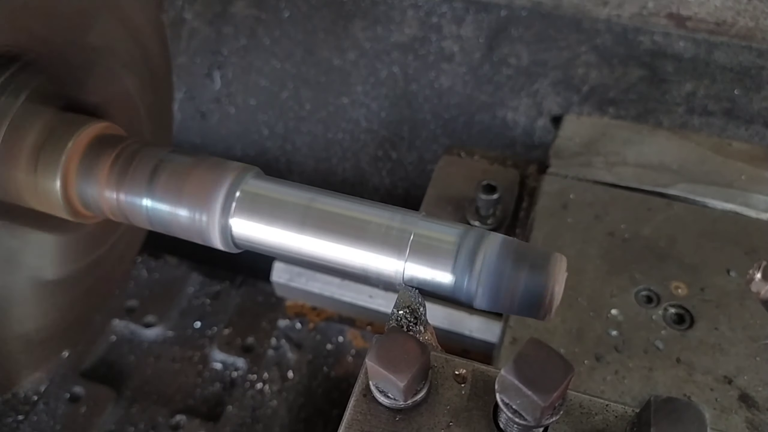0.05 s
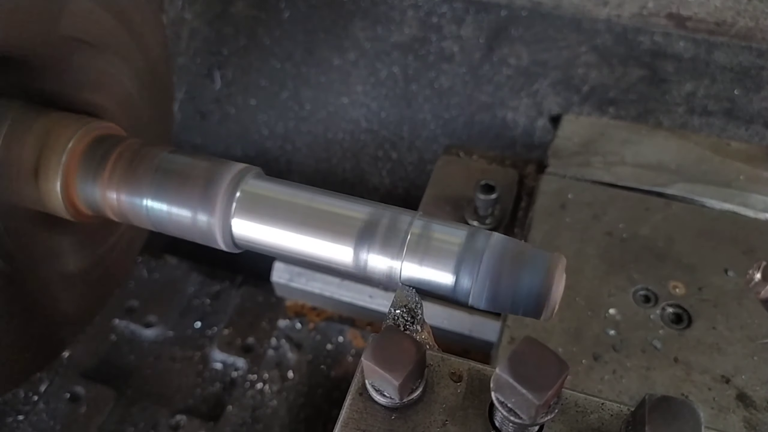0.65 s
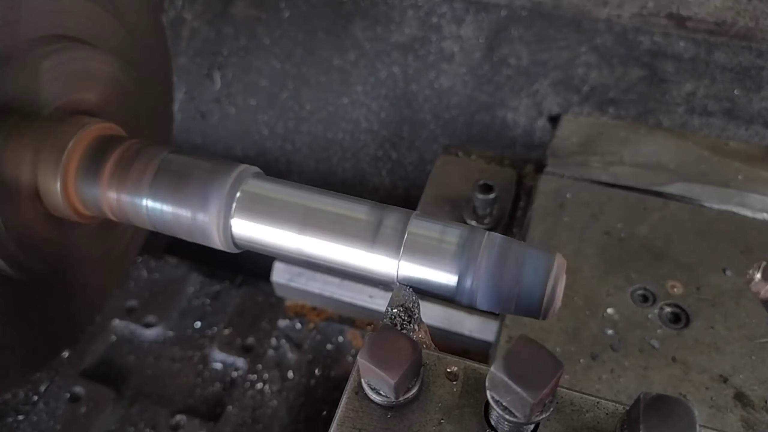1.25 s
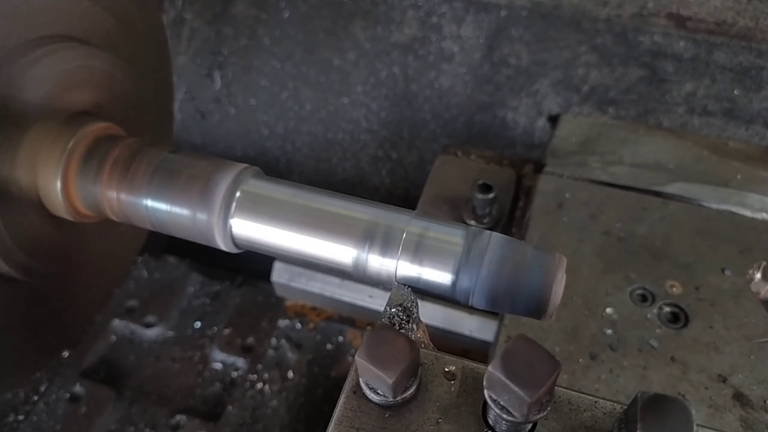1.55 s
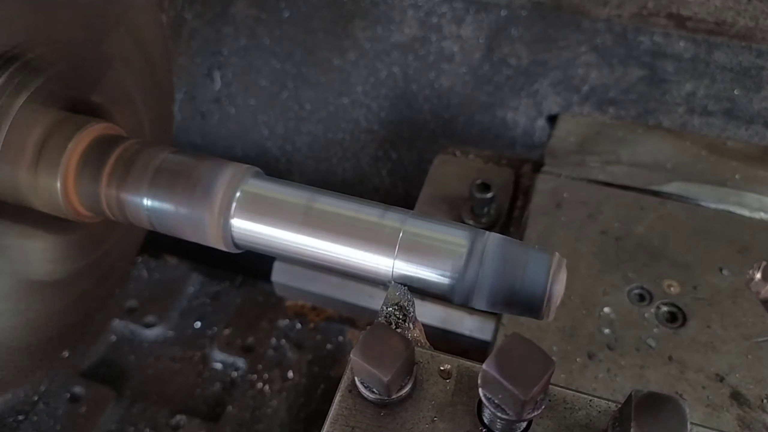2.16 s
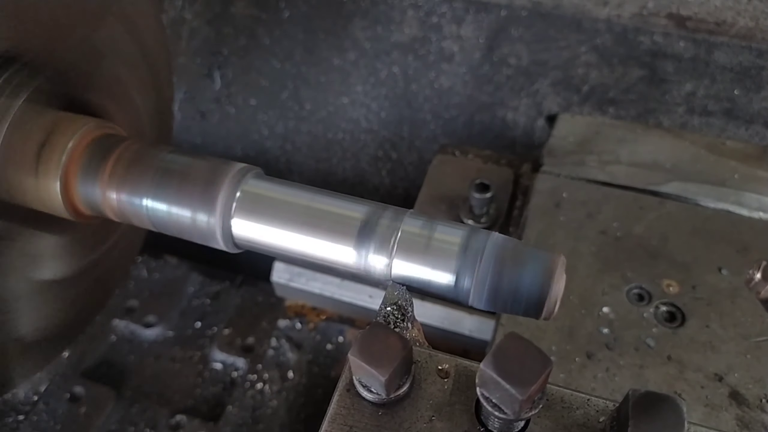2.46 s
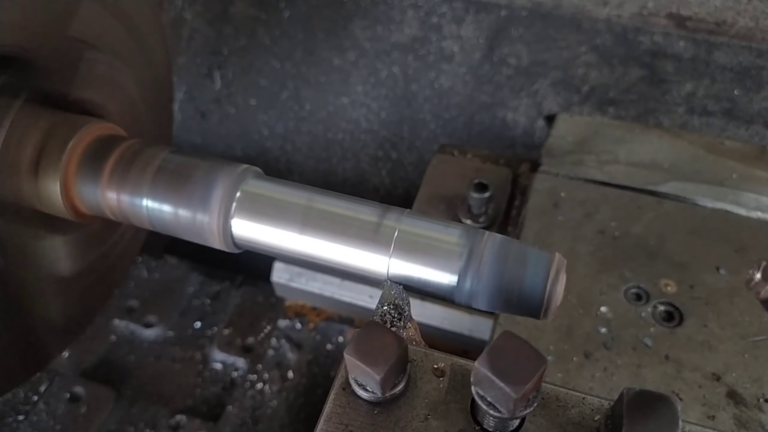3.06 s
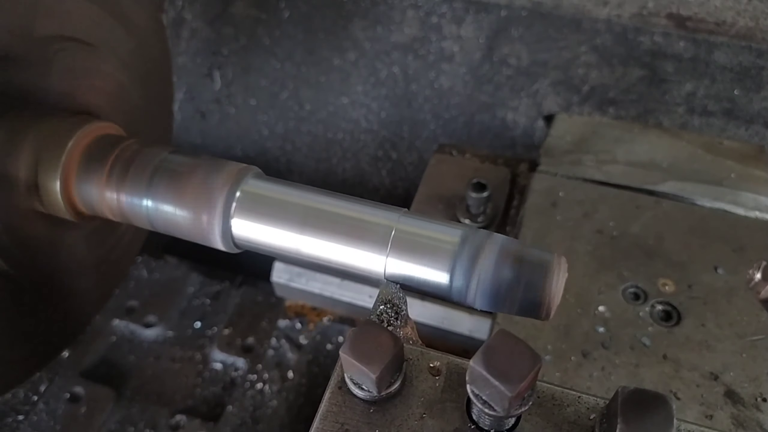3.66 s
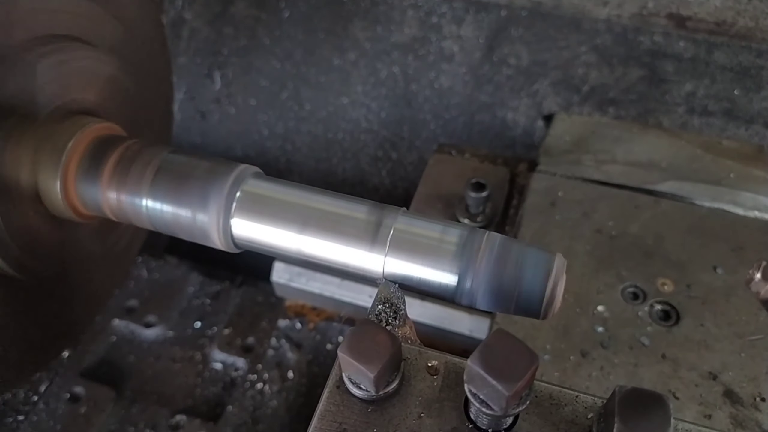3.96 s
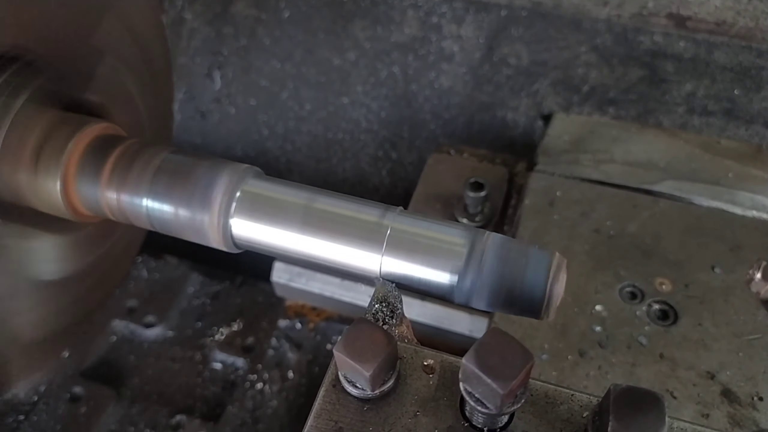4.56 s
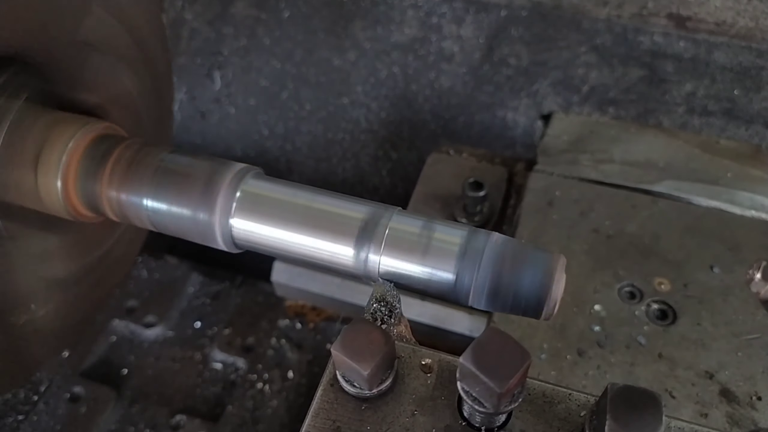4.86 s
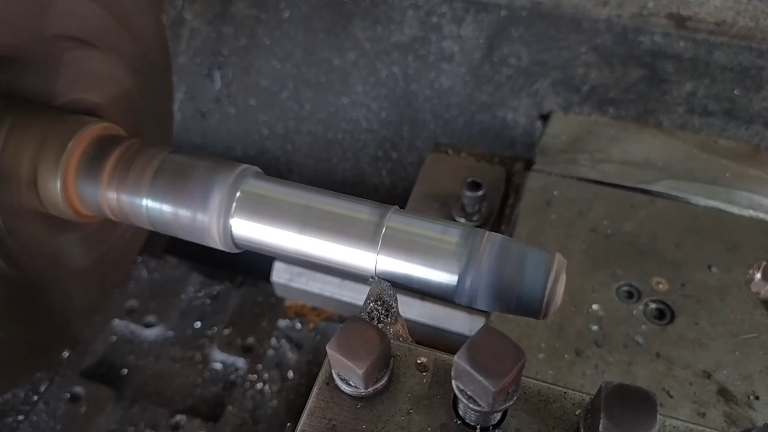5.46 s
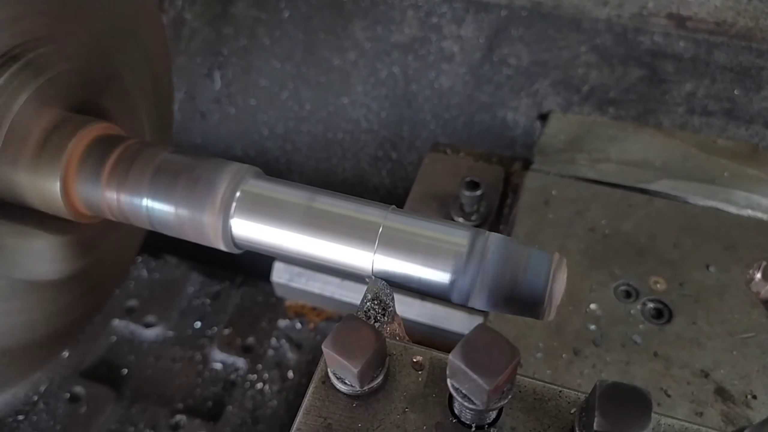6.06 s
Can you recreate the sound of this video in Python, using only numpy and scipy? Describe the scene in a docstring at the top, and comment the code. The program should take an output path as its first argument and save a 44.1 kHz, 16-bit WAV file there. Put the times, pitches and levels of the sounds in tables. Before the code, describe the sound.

A metal lathe runs steadily, its gears whining and rattling while the tool hisses along a spinning steel shaft.

```python
"""Whining, rattling gears and a bright hiss: a manual lathe takes a light cut along a steel shaft.
The headstock gears sing as they mesh and tick with each turn of their shafts; a bearing sizzles.
The chip hisses off the tool and rings the tool post, the edge squeals faintly, and for a while the
cut runs harder. Near the end something knocks once on the machine. One microphone above the tool,
on the right channel, with the workshop's low rumble behind; the left channel is all but dead."""
import sys
import numpy as np
from scipy import signal
from scipy.fft import rfft, irfft, next_fast_len
from scipy.io import wavfile
from scipy.ndimage import uniform_filter1d

SR = 44100
rng = np.random.default_rng(int(sys.argv[2]) if len(sys.argv) > 2 else 0)


def inscribe(sig):
    """Save sig as 16-bit PCM at rate SR to the path in sys.argv[1].

    A 1-D sig is mono; a 2-D sig holds one channel per row.
    Samples are clipped to [-1, 1] before scaling.
    """
    pcm = np.round(np.clip(np.atleast_2d(sig).T, -1, 1) * 32767)
    wavfile.write(sys.argv[1], SR, pcm.astype(np.int16))


N = 278712
TIME = np.arange(N) / SR
SIZE = next_fast_len(N)
BINS = np.maximum(np.arange(SIZE // 2 + 1) * SR / SIZE, 1)   # Hz

DRIVE_HZ, LAYSHAFT_HZ, PINION_HZ, SPINDLE_HZ = 29.83, 37.93, 39.245, 5.27   # turns per second
PINION_TEETH, DRIVE_TEETH = 58, 23
SPEED_WAVER = 0.000609   # share by which the motor's speed wanders


def from_db(db):
    """Decibels to gain."""
    return 10 ** (np.asarray(db) / 20)


def rms_one(x):
    """Scale to unit rms."""
    return x / np.sqrt(np.mean(x ** 2) + 1e-20)


def even(x):
    """Unit level over each twentieth of a second; the fast grain stays."""
    return x / np.sqrt(uniform_filter1d(x ** 2, size=SR // 20) + 1e-20)


def in_time(rows):
    """A curve of (time, level) points, at every sample."""
    return np.interp(TIME, *np.transpose(rows))


def swells(rows):
    """Decibels added by bell-shaped swells of (peak time, length, rise)."""
    return sum(db * np.exp(-(2 * (TIME - s) / length) ** 2) for s, length, db in rows)


def white():
    """White noise."""
    return rng.standard_normal(N)


def filtered(x, response):
    """Pass a sound through a frequency response."""
    return irfft(rfft(x, SIZE) * response, SIZE)[:N]


def drift(rate_hz):
    """A slow random wander of unit rms."""
    return rms_one(filtered(white(), 1 / (1 + (BINS / rate_hz) ** 2)))


def colour(points):
    """Gain at each frequency from a few (frequency, level) points."""
    hz, db = np.transpose(points)
    return from_db(np.interp(np.log(BINS), np.log(hz), db))


def resonances(modes):
    """Gain at each frequency of (frequency, width, level) modes that add in power."""
    return np.sqrt(sum(from_db(db) ** 2 / (1 + ((BINS ** 2 - hz ** 2) / (BINS * width)) ** 2)
                       for hz, width, db in modes))


def fine_modes(spread_db, width_hz):
    """A steel body has countless close modes: small peaks and dips in its response."""
    ripple = uniform_filter1d(rng.standard_normal(len(BINS)), size=max(1, int(width_hz * SIZE / SR)))
    return from_db(spread_db * rms_one(ripple))


def throb(turns, order, depth_db):
    """A gain that peaks `order` times per turn of a shaft."""
    return from_db(depth_db * np.cos(2 * np.pi * order * turns))


def tone(hz, waver_hz, flutter_db):
    """A sine of rms about 1 whose pitch and level waver."""
    phase = 2 * np.pi * (np.cumsum(hz + waver_hz * drift(9.07)) / SR + rng.random())
    return np.sqrt(2) * np.sin(phase) * from_db(flutter_db * drift(4.9))


def workshop():
    """Room tone: a low rumble, and the lathe bed droning in its low modes."""
    # spectrum of the room: (frequency [Hz], level [dB])
    rumble_colour = [(15, 2), (30, 2.5), (80, -2.5), (150, -0.5), (200, -0.5), (350, 2), (1000, -12),
                     (4000, -35)]
    # modes of the bed: (frequency [Hz], width [Hz], level [dB])
    bed_modes = [(113, 13, 0), (154, 10, -2.5)]
    rumble = from_db(-65) * rms_one(filtered(white(), colour(rumble_colour)))
    bed = resonances(bed_modes) ** 1.6   # a power above 1 sharpens the peaks
    return rumble + from_db(-76) * rms_one(filtered(white(), bed))


def knock(contact_s, tail_s, tail_db):
    """A short clattering contact rings the steel; the workshop answers with a diffuse tail."""
    # the knock and its rebound: (time [s], level [dB])
    hits = [(6.21, -27.5), (6.2154, -31)]
    # modes of the struck steel: (frequency [Hz], level [dB], time to fall 60 dB [s])
    modes = [(718, 2, .027), (1080, -4, 0.02), (1320, -3, 0.015), (1560, 2, 0.021), (1910, 1.5, 0.026),
             (2310, -9, .013), (2670, 4, 0.033), (3090, 7, 0.021), (3480, -7, .017), (4750, -5, .01)]
    steel = resonances([(hz, np.log(1000) / (np.pi * t60), db) for hz, db, t60 in modes])
    out = np.zeros(N)
    for s, db in hits:
        age = np.maximum(TIME - s, 0)
        envelope = (TIME >= s) * (np.exp(-age / contact_s) + from_db(tail_db) * np.exp(-age / tail_s))
        out += from_db(db) * envelope * even(filtered(white(), steel))
    low_cut = signal.butter(4, 650, "high", fs=SR, output="sos")   # the knock carries no bass below about 650 Hz
    return signal.sosfilt(low_cut, out + 1e-18)


def bearing(turns):
    """A shaft bearing sizzles in rapid ticks, four to a turn, one of them the strongest."""
    # modes of the bearing: (frequency [Hz], width [Hz], level [dB])
    modes = [(6880, 110, -1), (7184, 164, -3), (7540, 160, -9), (8480, 44, -8), (9450, 230, -8),
             (10780, 560, -7.5), (13900, 80, -15)]
    # surges of the sizzle: (peak time [s], length [s], rise [dB])
    surges = [(.5, .5, 0.5), (1.4, 0.33, 2), (3.7, .45, 2), (4.55, 0.28, 2.5), (5.85, .3, 1.5)]
    pulsing = throb(turns, order=1, depth_db=2.5) * throb(turns, order=4, depth_db=5.0)
    body = resonances(modes) ** 1.3 * fine_modes(spread_db=4.0, width_hz=14)
    level_db = -45.5 + swells(surges) + 0.78 * drift(14)
    return from_db(level_db) * rms_one(filtered(white() * pulsing, body))


def chatter(turns, uneven_db, burst_s):
    """Backlash rattles the gears in uneven bursts, which ring two modes of the headstock."""
    # the two modes: (frequency [Hz], width [Hz], resting level [dB])
    modes = [(883, 66, -47.5), (1219, 64, -49.5)]
    # loudest bursts: (peak time [s], rise of lower mode [dB], rise of upper mode [dB])
    bursts = [(.25, 0.5, 8.5), (1.77, 6, 0), (2.22, 4, 2), (3.39, 4.5, -5), (4.1, 4.5, 5), (5.53, 6, -4),
              (5.68, 0, 10)]
    ticking = throb(turns, order=1, depth_db=-0.5)
    out = np.zeros(N)
    for k, (hz, width, db) in enumerate(modes):
        burst_db = swells([(s, burst_s, rises[k]) for s, *rises in bursts])
        ring = even(filtered(white() * ticking, resonances([(hz, width, 0)]) ** 1.42))
        out += from_db(db + burst_db + uneven_db * drift(17)) * ring
    return out * throb(turns, order=7, depth_db=0.7)


def gear_rattle(turns, hard, repeat_share):
    """Teeth knock together, their flaws coming back every turn; the casing rings up in the hard cut."""
    # loudness of the rattle: (time [s], level [dB])
    rattle_level = [(0, -40.5), (1.2, -41), (2.0, -41.2), (2.8, -40.5), (4.5, -40.5), (5.3, -41.5),
                    (6.3, -40.5)]
    # its broad spectrum: (frequency [Hz], level [dB])
    gear_colour = [(200, -42), (350, -19), (420, -10), (520, -10), (620, -1), (800, -3.5), (1000, -2),
                   (1220, -4.5), (1400, -2.5), (1540, -5), (2150, -3.5), (2600, -8.5), (3500, -11),
                   (6000, -20.5), (15000, -49)]
    # modes of the headstock: (frequency [Hz], width [Hz], level [dB])
    headstock_modes = [(435, 17, -28), (708, 22, -7), (1340, 13, -6), (1692, 18, -1.5), (1880, 39, -3),
                       (1936, 65, -3.5), (2238, 170, -5.5)]
    # modes of the casing: (frequency [Hz], width [Hz], level [dB])
    casing_modes = [(1080, 130, -1.2), (1365, 48, 2.2)]
    flaws = rng.standard_normal(int(SR / DRIVE_HZ))
    flaws = irfft(np.exp(1j * np.angle(rfft(flaws))))   # all harmonics of the turn are driven alike
    repeating = rms_one(np.interp(turns % 1, np.linspace(0, 1, len(flaws)), flaws))
    force = np.sqrt(repeat_share) * repeating + np.sqrt(1 - repeat_share) * white()
    ticking = throb(turns, order=1, depth_db=0.96) * throb(turns, order=7, depth_db=0.6)
    body = np.hypot(colour(gear_colour), from_db(4) * resonances(headstock_modes))
    body /= np.sqrt(1 + (400 / BINS) ** 8)   # the casting radiates little bass
    rattle = from_db(in_time(rattle_level)) * rms_one(filtered(force * ticking, body))
    shaking = white() * throb(turns, order=1, depth_db=2.0)
    casing = even(filtered(shaking, resonances(casing_modes) ** 1.34))
    return rattle + from_db(-59 + 14 * hard) * casing


def gear_whine(speed, run_s):
    """Meshing teeth sing at pitches that follow the motor; the main mesh throbs with its shafts."""
    # swell and fade of the main mesh: (time [s], relative level [dB])
    main_level = [(0.0, -46), (0.8, -48), (0.96, -42.5), (1.2, -47.5), (1.28, -43), (1.76, -46.5),
                  (2.16, -47.1), (2.32, -43), (2.88, -46), (3.36, -47), (4.4, -44), (4.64, -47.3),
                  (4.88, -44.5), (5.52, -47.0), (6.08, -49), (6.31, -42)]
    # swell and fade of the lower mesh: (time [s], relative level [dB])
    low_level = [(0.0, -43.5), (0.72, -54), (0.88, -45), (1.2, -45), (1.44, -56), (1.6, -45.5), (2.16, -46),
                 (2.32, -48), (2.8, -45.8), (3.2, -55), (3.44, -44), (4.32, -52), (4.64, -47.9),
                 (5.2, -53.5), (5.44, -47.9), (6.0, -52), (6.16, -47.5), (6.31, -56)]
    # faint low tones of motor, gears and bearings: (frequency [Hz], relative level [dB])
    hum_tones = [(150.7, -77.5), (398.4, -63), (446.8, -69), (646.0, -62)]
    # tones added by uneven teeth: (frequency [Hz], relative level [dB])
    sideband_tones = [(893.6, -54), (1163, -55), (1222, -53.5), (1251, -53.5), (1319, -58.5), (1405, -54.5),
                      (1669, -63.5), (1852, -55)]
    # faint high tones of motor, gears and bearings: (frequency [Hz], relative level [dB])
    whine_tones = [(2807, -59.5), (3192, -66), (3709, -57.5), (3887, -58), (4447, -61), (4554, -50.5),
                   (4634, -60), (5006, -60), (5087, -59), (6988, -55), (7063, -56), (7880, -63),
                   (8339, -63)]

    def tones(rows, waver_hz, flutter_db):
        """A set of tones that follow the motor's speed."""
        return sum(from_db(db) * tone(hz * speed, waver_hz, flutter_db) for hz, db in rows)

    runout = throb(PINION_HZ * run_s, order=1, depth_db=2.3)
    runout *= throb(SPINDLE_HZ * run_s, order=1, depth_db=1.0)
    main_gain = from_db(in_time(main_level) - 0.1) * runout
    main = main_gain * tone(PINION_TEETH * PINION_HZ * speed, waver_hz=0.94, flutter_db=0.76)
    low_gain = from_db(in_time(low_level) - 1.55 + 2.0 * drift(18))
    low = low_gain * tone(DRIVE_TEETH * DRIVE_HZ * speed, waver_hz=1.6, flutter_db=1.55)
    hums = from_db(-2.5) * tones(hum_tones, waver_hz=2.24, flutter_db=2.0)
    sidebands = from_db(-3.5) * tones(sideband_tones, waver_hz=1.99, flutter_db=3.0)
    whines = from_db(-1.7) * tones(whine_tones, waver_hz=1.57, flutter_db=2.04)
    return main + low + hums + sidebands + whines


def hard_cut(start_s, attack_s, hold_s, release_s):
    """How far the cut has gone into its hard stretch, 0 to 1."""
    corners = start_s + np.cumsum([0, attack_s, hold_s, release_s])
    return np.interp(TIME, corners, [0, 1, 1, 0])


def tool_post(hard):
    """The cut rings the post: a noisy ring and a clear note, both louder in the hard stretch."""
    # modes of the post: (frequency [Hz], width [Hz], level [dB])
    modes = [(3218, 66, 0), (3397, 38, -1.1)]
    # milder swells of its ringing: (peak time [s], length [s], rise [dB])
    surges = [(.5, 0.83, 5), (4.9, 1.2, 7)]
    ring = from_db(-58) * even(filtered(white(), resonances(modes)))
    note = from_db(-61.5) * tone(hz=3244, waver_hz=1.27, flutter_db=1.5)
    return from_db(9.5 * hard + swells(surges)) * (ring + note)


def tool_shank(hard, damping_db):
    """The tool's shank sings in one broad mode, slightly damped by the hard cut."""
    # mode of the shank: (frequency [Hz], width [Hz], level [dB])
    mode = [(4454, 290, 0)]
    # where it sings up: (peak time [s], length [s], rise [dB])
    surges = [(.15, .35, 2), (3.1, 0.26, 3.5)]
    level_db = -50.5 - damping_db * hard + swells(surges) + 1.8 * drift(16)
    return from_db(level_db) * even(filtered(white(), resonances(mode) ** 1.46))


def edge_squeal(note_hz, rasp_hz, rasp_width_hz):
    """The cutting edge squeals faintly: a wavering note with a rough band of noise around it."""
    # where it squeals up: (peak time [s], length [s], rise [dB])
    squeals = [(.16, .16, 5), (.47, .12, 5), (.96, 0.067, 5), (1.57, 0.18, 7.5), (2.13, 0.42, 4),
               (2.66, 0.29, 3.5), (3.15, 0.18, 6), (3.88, 0.4, 5), (4.12, .08, 4)]
    rasp = even(filtered(white(), resonances([(rasp_hz, rasp_width_hz, 0)]) ** 0.92))
    level_db = -54 + swells(squeals) + 0.56 * drift(19)
    return from_db(level_db) * (tone(note_hz, waver_hz=4.83, flutter_db=1.7) + from_db(1) * rasp)


def chip_hiss(level_db):
    """Below the microphone the chip shears in countless tiny slips that ring the tool."""
    # broad spectrum of the cut: (frequency [Hz], level [dB])
    cut_colour = [(500, -36), (2000, -11), (3500, 0), (4900, 1), (5800, 0), (6500, 1.5), (7300, -1),
                  (7800, -3), (8700, -5), (10000, -2.5), (11200, 0), (12700, -6.5), (15400, -9.5)]
    # modes of the tool: (frequency [Hz], width [Hz], level [dB])
    tool_modes = [(2900, 83, -6), (3920, 130, -10.5), (5010, 93, 0), (5470, 68, -5)]
    slips = white() * from_db(0.5 * drift(78))
    body = np.hypot(colour(cut_colour), from_db(7) * resonances(tool_modes))
    body *= fine_modes(spread_db=1.55, width_hz=20)
    body /= np.sqrt(1 + (1200 / BINS) ** 4)   # the small tool radiates only treble
    return from_db(level_db) * rms_one(filtered(slips, body))


def scene():
    """Gearbox, workshop, cut and knock, heard from one point above the tool."""
    hard = hard_cut(start_s=1.26, attack_s=0.47, hold_s=0.58, release_s=0.36)
    speed = 1 + SPEED_WAVER * drift(2.96)
    run_s = np.cumsum(speed) / SR   # time as the wandering motor counts it
    gearbox = gear_rattle(DRIVE_HZ * run_s, hard, repeat_share=0.26)
    gearbox += chatter(DRIVE_HZ * run_s, uneven_db=2.0, burst_s=0.064)
    gearbox += gear_whine(speed, run_s) + bearing(LAYSHAFT_HZ * run_s)
    room = workshop()
    cut = chip_hiss(level_db=-40) + tool_post(hard) + tool_shank(hard, damping_db=1)
    cut += edge_squeal(note_hz=2843, rasp_hz=2825, rasp_width_hz=87)
    mix = room + gearbox + cut + knock(contact_s=0.0099, tail_s=0.032, tail_db=-15)
    return np.tile(mix, (2, 1))


def record(dry):
    """The microphone feeds the right channel; the left holds only faint noise. The top is cut."""
    # noise floor of the dead channel: (frequency [Hz], level [dB])
    floor_colour = [(20, 18), (200, 12.0), (1000, 2.5), (15000, -13.0)]
    live = dry[1] * from_db(6)
    dead = from_db(-87.5) * rms_one(filtered(white(), colour(floor_colour)))
    low_pass = 1 / np.sqrt(1 + (BINS / 15500) ** 400)   # a steep edge at 15.5 kHz
    return np.array([filtered(channel, low_pass) for channel in (dead, live)])


dry = scene()
out = record(dry)
inscribe(out)
```